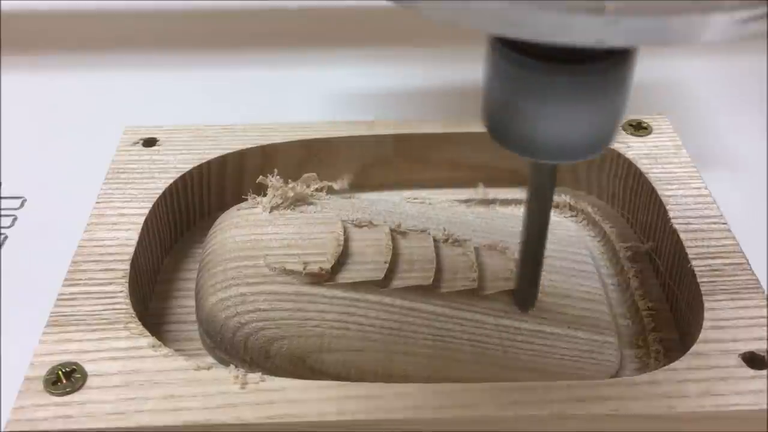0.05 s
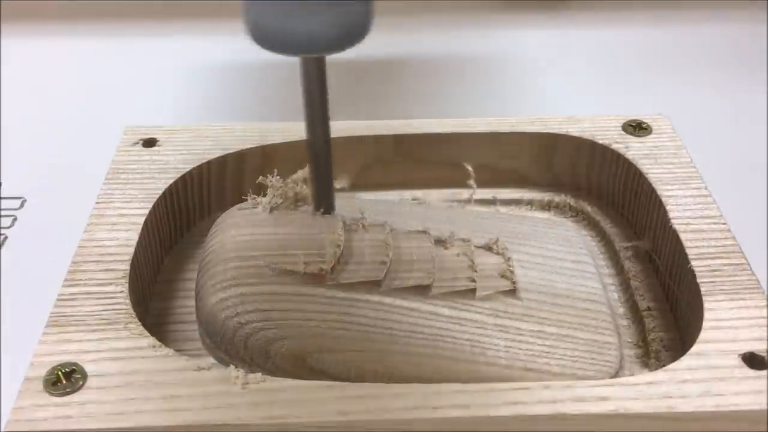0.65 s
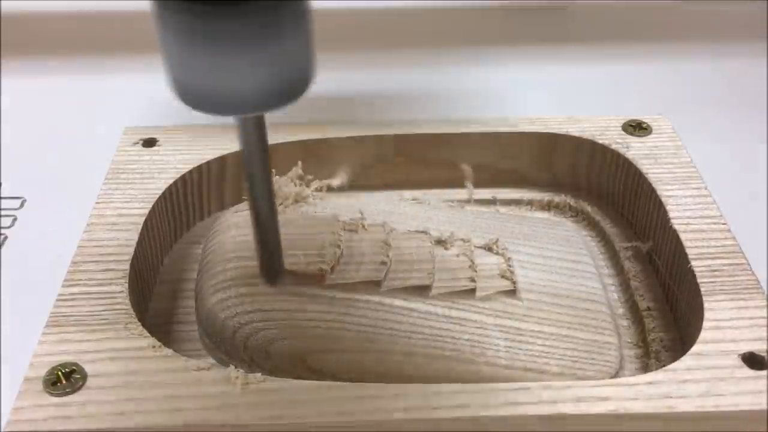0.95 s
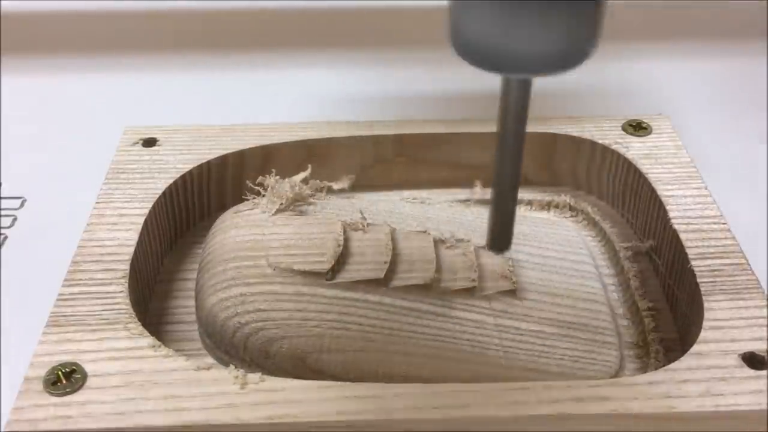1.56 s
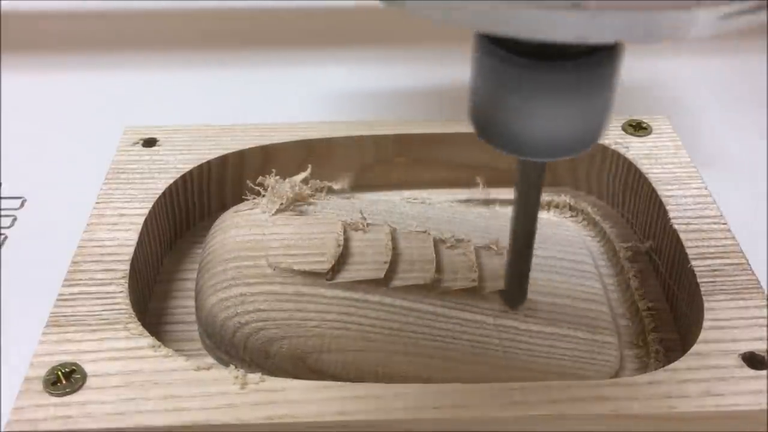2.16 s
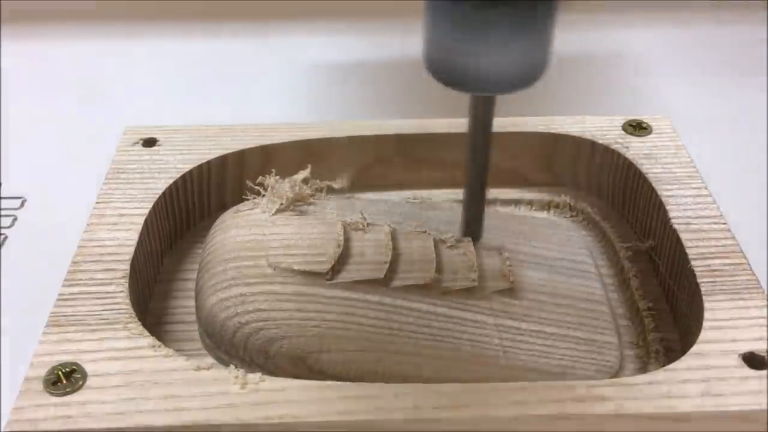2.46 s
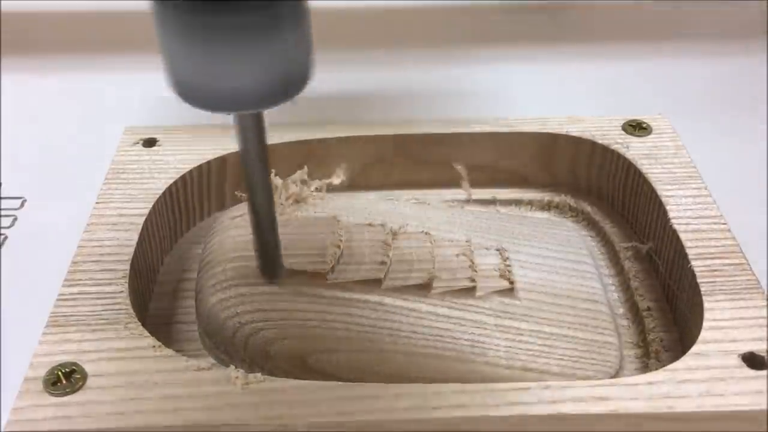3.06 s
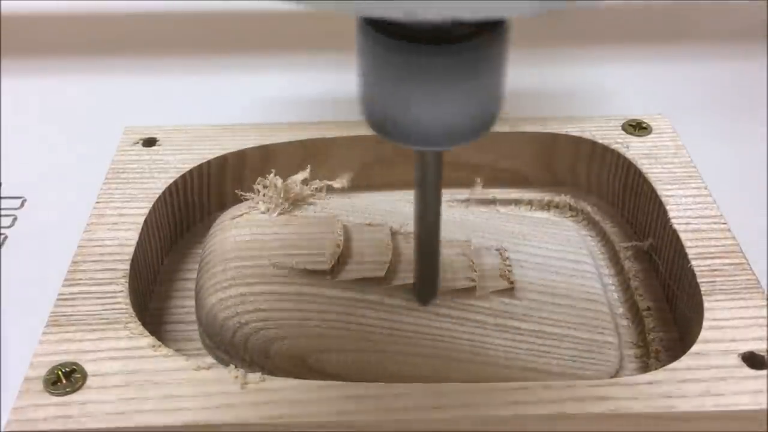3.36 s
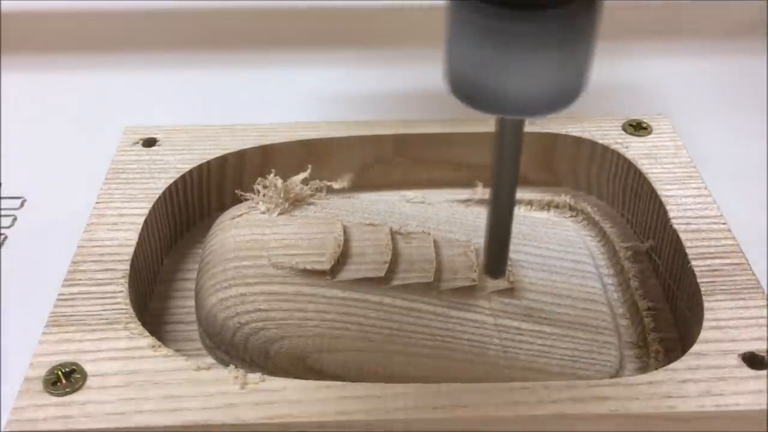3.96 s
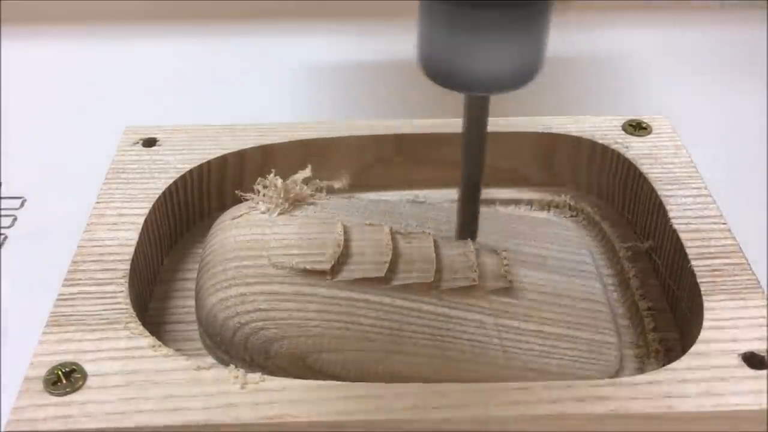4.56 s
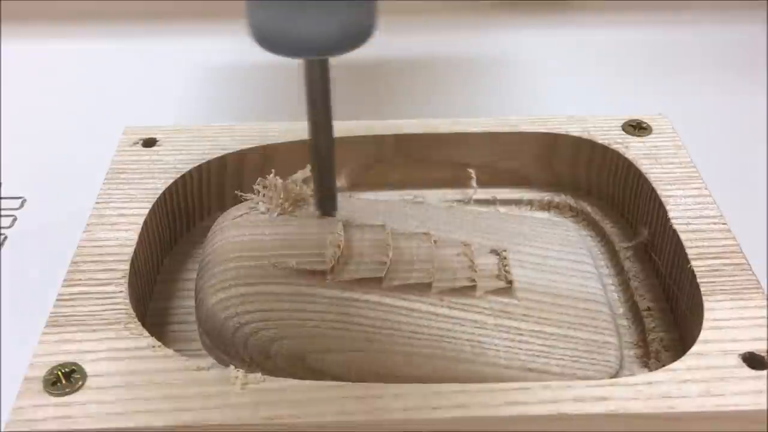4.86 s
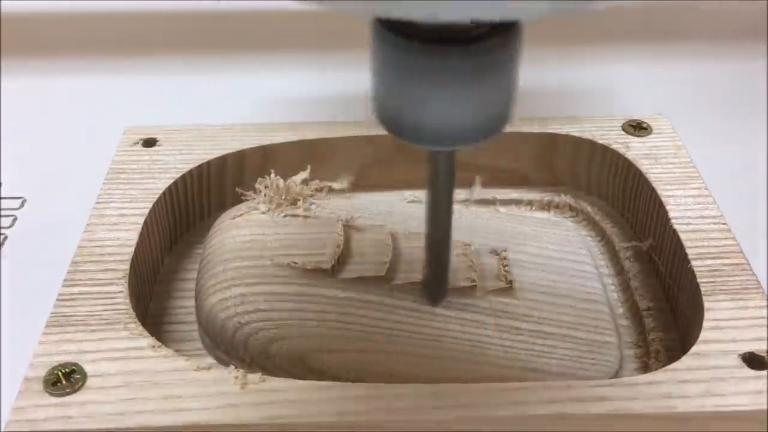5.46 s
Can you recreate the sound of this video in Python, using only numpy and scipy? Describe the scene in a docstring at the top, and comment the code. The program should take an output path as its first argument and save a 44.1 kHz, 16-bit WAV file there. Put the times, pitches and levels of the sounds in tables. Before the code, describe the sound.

A router spindle whines high over a steady hiss, swelling and throbbing as its bit carves wood in repeated passes.

```python
"""A high whine over a steady hiss: a computer-guided router carves wood, going three laps round the piece.
The whine comes from the spindle, the fast shaft that spins the cutting bit, and from its bearing.
It swells and throbs where the bit bites. The hiss is cooling air, mixed with the crackle of wood chips.
Underneath, the motors that steer the bit sing faintly up and down."""
import sys
import numpy as np
from scipy import signal
from scipy.fft import rfft, irfft
from scipy.io import wavfile
from scipy.ndimage import uniform_filter1d

SR = 44100
rng = np.random.default_rng(int(sys.argv[2]) if len(sys.argv) > 2 else 0)


def master(y):
    """Save y as 16-bit WAV."""
    cut = np.clip(np.atleast_2d(y).T, -1, 1)
    pcm = np.round(cut * 32767)  # scale
    wavfile.write(sys.argv[1], SR, pcm.astype(np.int16))


N = 251811
TIME = np.arange(N) / SR

# Laps of one path. lap_s below is the time into a lap, multiplied by that lap's pace.
# Columns: start_s, pace_ratio, throb_hz, squeak_change_db
LAPS = [(0.0, 1.0, 41, 0), (2.126, 1.011, 41.5, 4), (4.229, 1.03, 42, -7)]

# Tone colour of each noise. Columns: frequency_hz, relative_db
COOLING_SPECTRUM = [(40, -52), (100, -35.5), (190, -12.5), (500, -9), (1000, -11), (1900, -11.5),
                    (2900, -6), (3800, -5.5), (5200, -9), (6400, -13), (8500, -1), (11000, 0.5), (12800, 0),
                    (13700, -3), (16000, -7.5)]  # the spindle's cooling air
WHISK_SPECTRUM = [(100, -90), (3000, -51), (6000, -6.5), (8500, -0.5), (11500, -5), (12700, 2.5),
                  (13600, -20), (16000, -36)]  # air stirred by the bit's cutting edges
CHIP_SPECTRUM = [(60, -65), (500, -35), (3000, -33), (4800, -1), (6000, 24), (7200, 34), (8500, -45),
                 (11500, -22), (16000, -18)]  # chips torn from the wood
# Brief dips in the hiss. Columns: centre_s, depth_db, half_width_s
HISS_DIPS = [(.501, 16, .01), (.608, 11, .011), (.664, 32, .017), (1.14, 15, .011), (1.272, 13, .011),
             (1.505, 15, .01), (2.777, 32, .016), (3.126, 13, .009), (3.245, 24, .016), (3.51, 12, .011),
             (4.02, 12, .01), (4.897, 16, .01), (5.025, 16, .011), (5.194, 12, .009), (5.491, 10, .013)]

# Moves of the feed motor. Columns: start_lap_s, end_lap_s, first_hz, middle_hz, last_hz, level_db
FEED_MOVES = [(.07, 0.196, 565, 545, 509.3, -51), (0.321, 0.623, 533.5, 585.3, 531, -55),
              (.63, 0.837, 537, 470, 381, -53.5), (1.0, 1.17, 265.7, 250, 281, -56.5),
              (1.251, 1.461, 518, 539, 555, -50.5), (1.517, 1.63, 553, 550, 537, -53.5)]
# Runs of the lift motor. Columns: start_lap_s, end_lap_s, attack_s, release_s, level_db
LIFT_RUNS = [(-.02, .14, .02, .05, -58.5), (.15, .85, 0.027, .15, -56), (1.5, 2.15, 0.037, .02, -56.5)]
# Notes of the shaking frame that carries the spindle. Columns: pitch_hz, relative_db
FRAME_NOTES = [(270, -60), (405, -59), (545, -54), (640, -61)]
# When the frame shakes. One pair: centre_lap_s, half_length_s
FRAME_SHAKE = (1.57, .06)

# Turns of the spindle per second, sagging over each long cut. Columns: time_s, speed_hz
SPINDLE_SPEED = [(0, 1747), (.35, 1751.5), (.8, 1744), (.95, 1749), (1.1, 1750), (1.35, 1744.5),
                 (2.15, 1744), (2.47, 1746.5), (2.88, 1735), (3.1, 1748.5), (3.25, 1752), (3.6, 1750),
                 (4.25, 1754), (4.4, 1758.5), (4.8, 1753.5), (5, 1750), (5.15, 1755), (5.71, 1747)]
# Harmonics (1, 2, 3... times the spindle's speed) when it spins freely. One each: level_db
IDLE_HARMONICS = [-53, -48, -54.5, -78]
# The bearing's main tone before the tip pushes on it, and its neighbours one spindle speed away.
# Columns: lap_s, main_db, below_db, above_db
BEARING_LEVELS = [(0, -39, -50, -43), (.1, -42, -45, -44), (.4, -38, -53, -42), (.7, -37, -44, -40),
                  (.92, -37.5, -53, -43), (1.05, -33.5, -42, -36), (1.38, -40, -43, -46),
                  (1.6, -36.5, -50, -40), (2.12, -37.5, -50, -39)]
# Extra bearing tones under load. Columns: offset_in_spindle_speeds, relative_db
BEARING_SIDE_TONES = [(2, -15), (3, -15), (4, -8), (5, -9), (-7, -16), (-10, -18), (-11, -18), (-12, -16)]

# Four ways the bit meets the wood. Columns: start_lap_s, end_lap_s, attack_s, release_s, relative_db
SIDE_RUBS = [(.045, .33, 0.012, 0.056, -3.5), (.85, 1.22, 0.29, 0.033, -4.5), (1.17, 1.51, 0.058, 0.016, 0)]  # its side rubs along the wall of the cut
TIP_CUTS = [(.158, .325, .02, .04, 0), (.315, .85, .03, .45, 0), (.98, 1.18, .008, .08, -13)]  # its tip plunges, climbs over the carving, then dips in at the turn
SCREECHES = [(.048, .17, .03, .03, 0), (.16, .32, .02, .04, -1), (1.315, 1.51, .1, .012, 0)]  # it enters or leaves the wood
SQUEAKS = [(.5, .86, 0.13, 0.047, -9.5), (1.22, 1.38, 0.059, .06, -7)]  # it skims a ridge
# The whine at full load, one row per harmonic; growth says how fast it rises with the load.
# Columns: side_db, tip_db, screech_db, squeak_db, growth_db_per_db
CUTTING_HARMONICS = [(-42, -98.5, -102, -70, 0.45), (-56, -34.5, -61, -48, 0.65),
                     (-23.5, -28, -72, -31.5, 1.28), (-38, -20, -17, -42, 1.35), (-36, -31, -48, -50, 1.45),
                     (-33.5, -28.5, -43, -48, 0.7), (-40, -30.5, -28, -60, 1.1), (-50, -35, -46, -38, 1),
                     (-52, -53, -45, -29.5, 2.7)]


def from_db(db):
    """Turn decibels into a number to multiply by."""
    return 10 ** (np.asarray(db) / 20)


def unit_power(x):
    """Scale a signal to an average power of 1."""
    return x / np.sqrt(np.mean(x ** 2) + 1e-20)


def curves(rows, time=TIME):
    """Join a table's points with straight lines, one curve for each column after the time."""
    times, *columns = np.transpose(rows)
    return [np.interp(time, times, column) for column in columns]


def drift(rate_hz):
    """A smooth random wobble of size about 1; rate_hz sets how quickly it changes."""
    step = 20  # samples between random values
    pole = np.exp(-2 * np.pi * step * rate_hz / SR)
    noise = rng.standard_normal(N // step + 2002)
    slow = signal.lfilter([1], [1, -2 * pole, pole * pole], noise)[2000:]
    return np.interp(np.arange(N) / step, np.arange(len(slow)), unit_power(slow))


def coloured(noise, spectrum):
    """Give a noise its tone colour, at a power of 1."""
    hz, db = np.transpose(spectrum)
    bins_hz = np.maximum(np.fft.rfftfreq(N, 1 / SR), 1)
    gain = from_db(np.interp(np.log(bins_hz), np.log(hz), db))
    return unit_power(irfft(rfft(noise) * gain, N))


def tone(phase, rough, rate_hz):
    """A tone that trembles in strength and pitch; more rough makes it noisier."""
    strength = 1 + rough / 2 * drift(rate_hz)
    return np.sqrt(2) * (strength * np.sin(phase) + rough * drift(rate_hz) * np.cos(phase))


def phase_of(hz):
    """Add up a changing frequency into an angle."""
    return 2 * np.pi * np.cumsum(hz) / SR


def bump(time, centre, half_width, flatness):
    """A smooth hump of height 1."""
    return np.exp(-np.abs((time - centre) / half_width) ** flatness)


def ramp(lap_s, start, end, attack, release):
    """Fade in, hold at 1, fade out."""
    return np.clip(np.minimum((lap_s - start) / attack, (end - lap_s) / release), 0, 1)


def strokes(rows, lap_s, fade_db_per_s=0):
    """The strength of one kind of stroke, repeated on every lap; each may fade as it goes."""
    strength = 0
    for start, end, attack, release, db in rows:
        faded_db = db - fade_db_per_s * np.maximum(lap_s - start, 0)
        strength += from_db(faded_db) * ramp(lap_s, start, end, attack, release)
    return strength


def lap_clock():
    """How far along its lap the bit is, with that lap's throb rate and change in squeak level."""
    starts, paces, throb_hz, squeak_db = np.transpose(LAPS)
    lap = np.maximum(np.searchsorted(starts, TIME) - 1, 0)
    return (TIME - starts[lap]) * paces[lap], throb_hz[lap], squeak_db[lap]


def air(load, cooling_db=-28, whisk_db=-30, buried_load_db=-26):
    """Cooling air rushes out; the cutting edges add a bright hiss until they are buried in the wood."""
    cooling = from_db(cooling_db + drift(29)) * coloured(rng.standard_normal(N), COOLING_SPECTRUM)
    exposed = 1 / (1 + (load / from_db(buried_load_db)) ** 2)
    whisk = from_db(whisk_db) * exposed * coloured(rng.standard_normal(N), WHISK_SPECTRUM)
    return cooling + whisk


def chips(load, gain_db=-15, snaps_per_s=9000):
    """Wood fibres snap in a dense crackle that grows with the load on the bit."""
    sizes = from_db(3.5 * np.minimum(rng.exponential(1, N), 4)) * rng.choice([-1, 1], N)
    snaps = sizes * (rng.random(N) < snaps_per_s / SR)
    return from_db(gain_db) * load * coloured(snaps, CHIP_SPECTRUM)


def idle_whine(shaft):
    """The spinning shaft has a faint whine of its own."""
    return sum(from_db(db) * tone(shaft * k, rough=.76, rate_hz=90)
               for k, db in enumerate(IDLE_HARMONICS, 1))


def with_dips(hiss, split_hz=6500, treble_spared_db=9):
    """The hiss sinks for an instant now and then; only deep dips take much of the treble."""
    dip_db = sum(depth * bump(TIME, centre, width, flatness=3) for centre, depth, width in HISS_DIPS)
    treble_dip_db = 1.4 * np.maximum(dip_db - treble_spared_db, 0)
    low = signal.sosfiltfilt(signal.butter(4, split_hz, fs=SR, output="sos"), hiss)
    return low * from_db(-dip_db) + (hiss - low) * from_db(-treble_dip_db)


def frame_shudder(lap_s):
    """The frame shakes and rings briefly after the bit lifts clear."""
    ring = sum(from_db(db) * tone(2 * np.pi * hz * TIME, rough=2.2, rate_hz=35) for hz, db in FRAME_NOTES)
    return bump(lap_s, *FRAME_SHAKE, flatness=4) * ring


def lift_motor(lap_s, pitch_hz=667):
    """The motor that lifts the bit hums on one note."""
    return strokes(LIFT_RUNS, lap_s) * tone(phase_of(np.full(N, pitch_hz)), rough=.45, rate_hz=15)


def feed_motor(lap_s, fade_s=.031):
    """This motor moves the bit along; its pitch follows its speed in one smooth arc per move."""
    hz, gain = np.zeros(N), np.zeros(N)
    for start, end, first_hz, middle_hz, last_hz, db in FEED_MOVES:
        moving = (lap_s > start) & (lap_s < end)
        arc = np.polyfit([0, .5, 1], [first_hz, middle_hz, last_hz], 2)
        hz[moving] = np.polyval(arc, (lap_s[moving] - start) / (end - start))
        gain += from_db(db) * ramp(lap_s, start, end, fade_s, fade_s)
    return gain * tone(phase_of(hz), rough=.4, rate_hz=18)


def spindle_angle(flutter_hz=1.29):
    """How far the shaft has turned; its speed flutters a little."""
    speed_hz, = curves(SPINDLE_SPEED)
    return phase_of(speed_hz + flutter_hz * drift(18))


def cutting_load(tip, screech, idle_db=-32, tip_db=-22, screech_db=-24):
    """How hard the bit works, from the push on its tip and from its screech."""
    cutting_power = (from_db(tip_db) * tip) ** 2 + (from_db(screech_db) * screech) ** 2
    return np.sqrt(from_db(idle_db) ** 2 + cutting_power)


def tip_pressure(tip, resting_push=.2, onset_db=-3):
    """How firmly the bit is pressed into the wood, from 0 to 1."""
    push = resting_push + (tip / from_db(onset_db)) ** 2
    return push / (1 + push)


def chatter(pressure, calm=.1, ragged=.24):
    """The tones get rougher under pressure."""
    return calm + (ragged - calm) * pressure


def plunge_throb(lap_s, throb_hz, depth_db=5):
    """The bit slips in a quick, even beat as it plunges, so the level throbs."""
    plunge = bump(lap_s, centre=.228, half_width=.078, flatness=6)
    slip = np.sin(np.pi * throb_hz * (lap_s - .195)) ** 8
    return from_db(-depth_db * plunge * slip)


def grain_grip(pressure, slips_per_s=26, recover_s=.007):
    """At soft streaks in the wood a pressed bit loses its grip and takes a moment to find it again."""
    slips = (rng.random(N) < slips_per_s / SR) * rng.uniform(0, 11, N)
    lost_grip = signal.lfilter([1], [1, -np.exp(-1 / (recover_s * SR))], slips)
    return from_db(-uniform_filter1d(lost_grip, size=90) * pressure)


def bearing_whine(shaft, lap_s, tip, pressure, throb, passes_per_turn=3.622, push_db=-27):
    """The bearing's balls roll past and make a tone; load makes it louder and adds tones beside it."""
    main_db, below_db, above_db = curves(BEARING_LEVELS, lap_s)
    strength = np.hypot(from_db(main_db + 3.5 * drift(9.8)), from_db(push_db) * tip)
    main = strength * tone(shaft * passes_per_turn, chatter(pressure), rate_hz=60)
    below = from_db(below_db) * tone(shaft * (passes_per_turn - 1), rough=.44, rate_hz=24)
    above = from_db(above_db) * tone(shaft * (passes_per_turn + 1), rough=.57, rate_hz=40)
    side_tones = sum(from_db(db) * tone(shaft * (passes_per_turn + offset), rough=.11, rate_hz=31)
                     for offset, db in BEARING_SIDE_TONES)
    return throb * (main + np.sqrt(pressure) * strength * side_tones) + below + above


def cutting_whine(shaft, contacts, pressure, rasp=.15):
    """The cutting edges hit the wood on every turn; each kind of contact has its own mix of harmonics."""
    whine, rough, grip = 0, chatter(pressure), grain_grip(pressure)
    for k, (*levels_db, growth) in enumerate(CUTTING_HARMONICS, 1):
        power = sum((from_db(db) * contact ** abs(growth)) ** 2
                    for db, contact in zip(levels_db, contacts))
        wander_db = 1 + 2.5 * drift(20) if k > 4 else .8 * drift(14)
        height = k / 4  # higher harmonics tremble more and lose more at each slip
        harmonic = tone(shaft * k, rough * np.sqrt(height), rate_hz=70)
        whine += np.sqrt(power) * grip ** height * from_db(wander_db) * harmonic
    return (1 + rasp * pressure * drift(200)) * whine


def scene():
    """The router close by, the same in both ears."""
    lap_s, throb_hz, squeak_db = lap_clock()
    side = strokes(SIDE_RUBS, lap_s, fade_db_per_s=11)
    tip = strokes(TIP_CUTS, lap_s)
    screech = strokes(SCREECHES, lap_s, fade_db_per_s=14)
    squeak = from_db(squeak_db) * strokes(SQUEAKS, lap_s)
    shaft = spindle_angle()
    throb = plunge_throb(lap_s, throb_hz)
    pressure, load = tip_pressure(tip), cutting_load(tip, screech)
    cutting = throb * cutting_whine(shaft, (side, tip, screech, squeak), pressure)
    bearing = bearing_whine(shaft, lap_s, tip, pressure, throb)
    steering = lift_motor(lap_s) + frame_shudder(lap_s) + feed_motor(lap_s)
    hiss = with_dips(air(load) + chips(load * throb) + idle_whine(shaft))
    machine = hiss + steering + bearing + cutting
    return np.array([machine, machine])


def record(dry, cutoff_hz=15780):
    """Cut off the very highest treble steeply."""
    return signal.sosfilt(signal.ellip(12, .1, 90, cutoff_hz, fs=SR, output="sos"), dry)


dry = scene()
out = record(dry)
master(out)
```